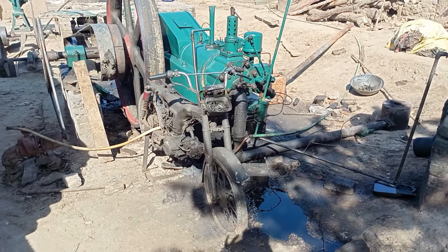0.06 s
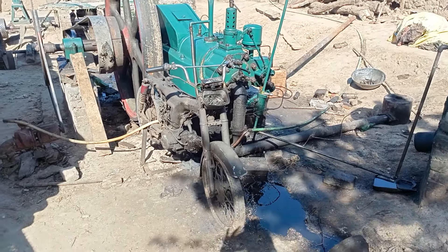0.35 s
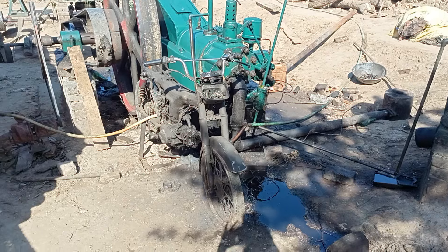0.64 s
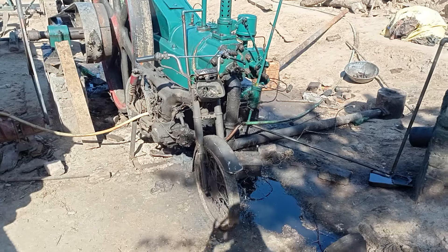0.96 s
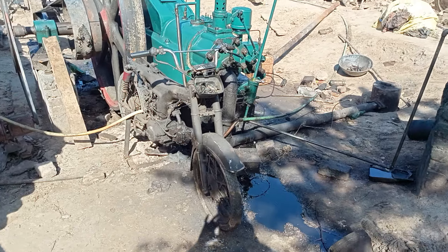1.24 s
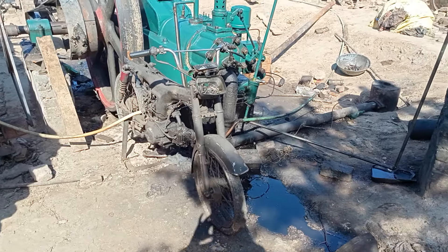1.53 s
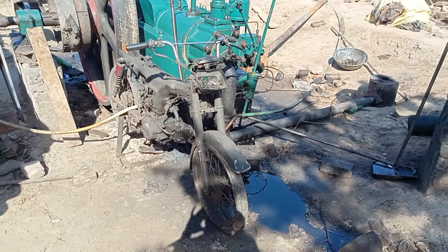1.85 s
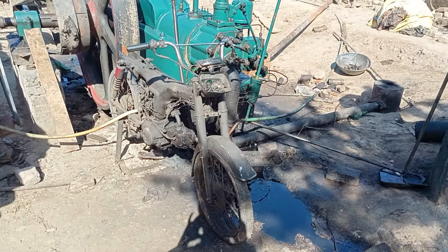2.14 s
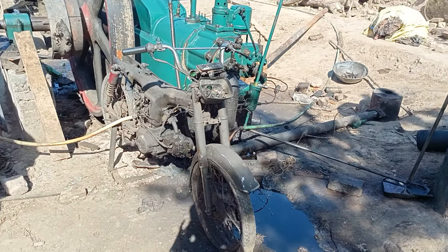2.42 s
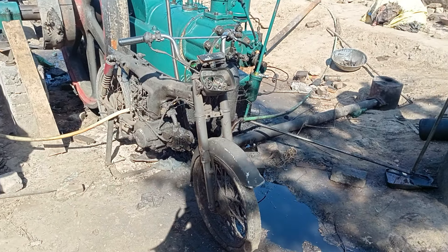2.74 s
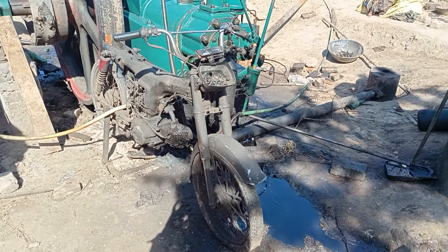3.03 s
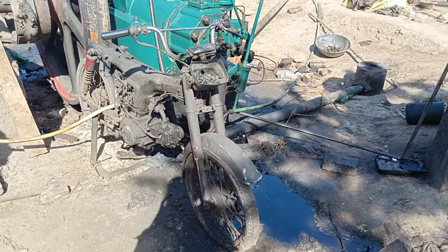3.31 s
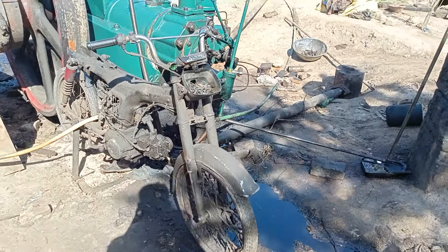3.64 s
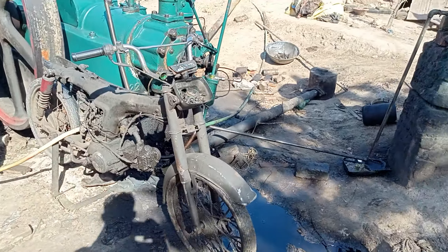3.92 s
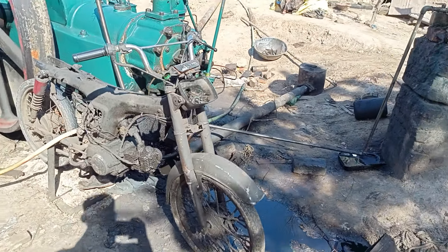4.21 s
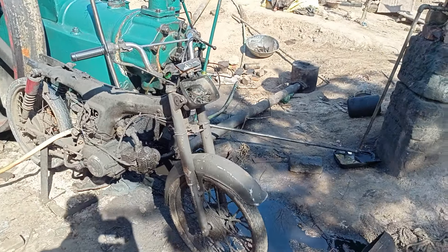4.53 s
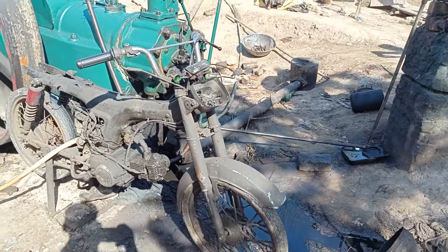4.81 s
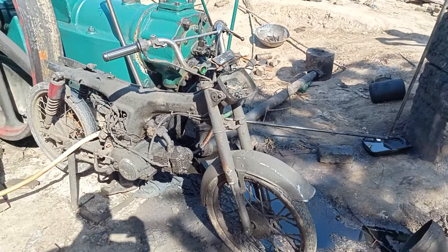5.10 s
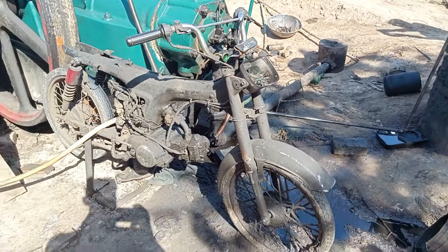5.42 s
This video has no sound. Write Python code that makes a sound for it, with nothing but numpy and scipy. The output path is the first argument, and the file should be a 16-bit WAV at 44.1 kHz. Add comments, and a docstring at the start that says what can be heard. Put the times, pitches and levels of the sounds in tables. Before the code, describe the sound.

Scattered birdsong outdoors, joined by a brief low hum, soft wind thumps on the microphone and then shoes scuffing over sandy ground.

```python
"""Birds in a quiet farmyard

Small birds chirp, whistle and twitter in gliding tones, scattered by walls and clutter.
A low hum swells and fades out, wind bumps the microphone, and something hard rings from one knock.
Shoes scuff over gritty ground in a spray of tiny clicks, all over a soft outdoor rustle."""
import sys
import numpy as np
from scipy import signal
from scipy.fft import rfft, irfft, next_fast_len
from scipy.io import wavfile
from scipy.ndimage import uniform_filter1d

SR = 44100
rng = np.random.default_rng(int(sys.argv[2]) if len(sys.argv) > 2 else 0)


def put_to_file(sound):
    """Save the sound as 16-bit audio at rate SR, in the file named by the first command-line argument."""
    columns = np.atleast_2d(sound).T  # one column per channel
    safe = np.clip(columns, -1, 1)
    whole_steps = np.round(safe * 32767)
    wavfile.write(sys.argv[1], SR, whole_steps.astype(np.int16))


N = 249606
TIME = np.arange(N) / SR


def undb(db):
    """Turn decibels into a number to multiply by."""
    return 10 ** (np.asarray(db) / 20)


def unit(x):
    """Scale a sound to an average strength (rms) of 1."""
    return x / np.sqrt(np.mean(np.abs(x) ** 2) + 1e-30)


def swell(centre, length):
    """A bell-shaped rise and fall, about length seconds wide."""
    return np.exp(-np.minimum(np.pi * ((TIME - centre) / length) ** 2 * .75, 60))


def envelope(start, length, attack_s, release_s):
    """Rise in a straight line, hold, and die away once length seconds have passed."""
    rise = np.clip((TIME - start) / attack_s, 0, 1)
    return rise * np.exp(-np.clip((TIME - start - length) / release_s, 0, 60))


def colour(x, points):
    """Shape the lows and highs of a sound along (f/Hz, level/dB) points; rms 1."""
    hz, db = np.transpose(points)
    size = next_fast_len(N)
    f = np.maximum(np.fft.rfftfreq(size, 1 / SR), 1)
    gain = undb(np.interp(np.log(f), np.log(hz), db))
    return unit(irfft(rfft(x, size) * gain, size)[:N])


def band(x, low_hz, high_hz, order=2):
    """Keep what lies between two frequencies; rms 1."""
    sos = signal.butter(order, [low_hz, min(high_hz, SR * .45)], "band", fs=SR, output="sos")
    return unit(signal.sosfilt(sos, x))


def resonance(x, hz, width_hz):
    """Make a sound ring around one frequency; rms 1."""
    return unit(signal.lfilter(*signal.iirpeak(hz, hz / width_hz, fs=SR), x))


def wander(rate_hz):
    """A smooth random wobble (complex numbers) that changes about rate_hz times a second; rms 1."""
    lead = SR // 2
    noise = rng.standard_normal(N + lead) + 1j * rng.standard_normal(N + lead)
    return unit(signal.sosfilt(signal.butter(2, rate_hz, fs=SR, output="sos"), noise)[lead:])


def ring(hz, width_hz):
    """Noise so narrow that it sounds like a wavering tone; rms 1."""
    return unit(np.real(wander(width_hz / 2) * np.exp(2j * np.pi * hz * TIME)))


def yard(x, near_db, far_db):
    """Add a quick scatter off nearby clutter and a thin echo from the walls."""
    t = TIME[:SR // 2]
    fade_s = np.array([[0.056], [0.42]])  # time to fall 60 dB: clutter, walls
    near, far = rng.standard_normal((2, len(t))) * undb(-60 * t / fade_s) * (t > .003)
    echo = undb(near_db) * near / np.linalg.norm(near) + undb(far_db) * far / np.linalg.norm(far)
    return x + signal.fftconvolve(x, echo)[:N]


def bird(notes, rasp_hz, softness=0.48):
    """Each note is a whistle gliding through three pitches; the rougher it is, the more it flutters."""
    out, flutter = np.zeros(N), wander(rasp_hz)
    for start, length, first, middle, last, db, rough in notes:
        span = slice(max(int(start * SR), 0), min(int((start + length) * SR), N))
        progress = np.clip((TIME[span] - start) / length, 0, 1)
        hz = np.polyval(np.polyfit([0, .5, 1], [first, middle, last], 2), progress)
        rough = np.clip(rough, 0, 1)
        voice = np.sqrt(1 - rough ** 2) + rough * flutter[span]
        effort = np.abs(np.sin(np.pi * progress)) ** softness
        out[span] += undb(db) * effort * np.real(voice * np.exp(2j * np.pi * np.cumsum(hz) / SR))
    return out


def glides(calls, sag=0):
    """Give each call a middle pitch: halfway between its ends, lowered by the share sag."""
    return [(s, length, first, (1 - sag) * (first + last) / 2, last, db, rough)
            for s, length, first, last, db, rough in calls]


# tone colour of the still air: f/Hz, level/dB
AIR_COLOUR = [(18, -55), (30, -6), (113, -0.5), (280, 0.5), (378, 3), (445, -2.5), (589, -6.5), (797, -10),
              (1010, -11), (1240, -40.5), (1420, -14), (2670, -19.5), (2860, -38.5), (4450, -44.5),
              (7780, -40), (10100, -72.5), (17100, -120)]


def air():
    """Still outdoor air: a faint, steady, mostly low noise."""
    return undb(-71) * colour(rng.standard_normal(N), AIR_COLOUR)


def flock(low_hz, high_hz, fall, spread_db, count, length_s=0.11):
    """Birds too far off to tell apart: a blur of short, rough, falling notes; rms 1."""
    notes = []
    for when, pitch, size, slope, loud in rng.random((count, 5)):
        hz = low_hz + pitch * (high_hz - low_hz)
        pitches = hz * (1 + fall * slope), hz, hz * (1 - fall * slope)
        notes.append((when * (TIME[-1] - .05), length_s * (.5 + size), *pitches, spread_db * loud, .9))
    return unit(yard(bird(notes, rasp_hz=115), near_db=1.5, far_db=-11))


# rise and fall of the rustle: t/s, body level/dB, hiss level/dB
RUSTLE_LEVELS = [(0.0, -76, -80.5), (0.35, -58.5, -71.5), (0.52, -70.5, -74), (0.69, -68, -73),
                 (0.93, -74.5, -80), (1.07, -74, -82.5), (1.32, -75.5, -88), (1.46, -73.5, -81),
                 (2.18, -69.5, -70), (2.47, -65.5, -80.5), (2.71, -72.5, -79.5), (2.95, -70.5, -79),
                 (3.2, -59, -63.5), (3.34, -70, -71.5), (3.72, -62.5, -81.5), (3.89, -70.5, -82),
                 (4.11, -71, -81.5), (4.24, -66, -70.5), (4.36, -64.5, -77), (4.51, -68.5, -84.5),
                 (4.62, -78, -86.5), (4.93, -76.5, -88), (5.22, -74.5, -80.5), (5.47, -68.5, -80.5),
                 (5.66, -77, -82.5)]
# tone colour of the rustle: f/Hz, level/dB
RUSTLE_COLOUR = [(530, -42), (900, -4.5), (1000, -7.5), (1310, 9.5), (1550, 4), (1800, 0.5), (2450, -2),
                 (2830, -8.5), (3990, -7), (4870, -12), (6210, -21), (7440, -24.5), (7780, -29),
                 (10100, -19.5), (17100, -120)]


def rustle(flicker_db=5.0, flock_db=-6):
    """A soft flickering rustle and distant bird chatter that rise and fall together."""
    times, body_db, hiss_db = np.transpose(RUSTLE_LEVELS)
    noise = colour(rng.standard_normal(N), RUSTLE_COLOUR)
    body = undb(-2.86 + flicker_db * wander(23).real) * band(noise, 1050, 3600, order=3)
    hiss = undb(-0.8 + flicker_db * wander(12).real) * band(noise, 3220, 7000, order=3)
    body += undb(flock_db) * flock(1900, 3500, fall=.12, spread_db=11, count=150)
    hiss += undb(flock_db) * flock(3500, 5900, fall=0.049, spread_db=4.5, count=260)
    return undb(np.interp(TIME, times, body_db)) * body + undb(np.interp(TIME, times, hiss_db)) * hiss


# swells of the hum: t/s, length/s, level/dB
HUM_SWELLS = [(-0.02, 0.068, -45), (0.074, 0.045, -43), (0.142, 0.066, -43), (0.257, 0.059, -41),
              (0.337, 0.066, -42), (0.459, 0.046, -43.5), (0.529, 0.058, -44), (0.592, 0.15, -53.5)]


def hum(hz=339):
    """A low tone comes in swells with a wavering lower partner; a faint drone stays on."""
    level = sum(undb(db) * envelope(s, length, attack_s=0.014, release_s=0.0085)
                for s, length, db in HUM_SWELLS)
    tone = np.sin(2 * np.pi * hz * TIME + 0.64 * wander(25).real)
    partner = undb(-8) * ring(295, 38) * uniform_filter1d(level, SR // 8)
    drone = undb(-79.5) * ring(345, 16) + undb(-75.5) * ring(392, 20)
    return level * tone + partner + drone


# gusts of light wind: t/s, length/s, level/dB
GUSTS = [(0.756, 0.073, -52.5), (1.021, 0.068, -44), (1.145, 0.2, -45.5), (1.453, 0.16, -47.5),
         (1.632, 0.1, -54), (1.976, 0.081, -58), (5.145, 0.25, -57), (5.51, 0.21, -62.5)]


def wind_gusts():
    """Each gust is a swell of deep rumbling noise."""
    level = sum(undb(db) * envelope(s, length, attack_s=0.026, release_s=0.023)
                for s, length, db in GUSTS)
    return level * band(rng.standard_normal(N), 40, 100.7, order=3)


# bumps of wind: t/s, f/Hz, level/dB, fade time/cycles
BUMPS = [(0.745, 69.6, -44, 0.39), (0.845, 78, -43.5, 0.6), (0.992, 110.8, -17.5, 1.9),
         (1.035, 199, -33, 2.1), (1.222, 95, -27.5, 0.56), (1.299, 97, -23.5, 0.88),
         (1.413, 87.6, -34.5, 1), (1.547, 72, -39, 1.2), (1.59, 112, -37.5, 0.74), (1.619, 75, -39.5, 1.2),
         (1.971, 100, -43, 0.79), (1.995, 88.4, -35, 0.77)]


def wind_bumps(rise_cycles=1.11, overtone_cycles=1.2):
    """Swirls of air push the microphone for a cycle or two, with a brief higher tone at each peak."""
    out = np.zeros(N)
    for s, hz, db, cycles in BUMPS:
        fade = np.exp(-np.minimum(np.abs(TIME - s) * hz / cycles, 20))
        push = np.where(TIME < s, swell(s, rise_cycles / hz), fade)
        phase = 2 * np.pi * hz * (TIME - s)
        overtone = undb(-11) * swell(s, overtone_cycles / hz) * np.sin(1.55 * phase)
        out += undb(db) * (push * np.cos(phase) + overtone)
    return signal.sosfilt(signal.butter(2, 40, "high", fs=SR, output="sos"), out)


# the blow and its small rebound: t/s, level/dB
KNOCKS = [(1.1114, -37.5), (1.1175, -59)]
# ringing tones of the knocked object: f/Hz, level/dB, time to fall 60 dB/s
KNOCK_TONES = [(680, 1.5, 0.044), (1440, -20.5, .025), (1600, -16, 0.0035), (2100, -6.5, 0.062),
               (2300, 8.5, 0.0093), (2660, -27, 0.029)]


def knock(crack_fade_s=0.01, echo_fade_s=0.12):
    """A hard tap: short ringing tones, a crack at contact and a brief rattle of echoes."""
    out = np.zeros(N)
    noise = band(rng.standard_normal(N), 1400, 2100, order=1)
    t = TIME[:SR // 5]
    tones = sum(undb(db - 60 * t / fade_s) * np.sin(2 * np.pi * hz * t) for hz, db, fade_s in KNOCK_TONES)
    burst = undb(-5 - 60 * t / crack_fade_s) + undb(-16 - 60 * t / echo_fade_s)
    for s, db in KNOCKS:
        span = slice(int(s * SR), int(s * SR) + len(t))
        out[span] += undb(db) * (tones + burst * noise[span])
    # the contact lasts a moment, which dulls the treble; a small object gives off no bass
    return signal.sosfilt(signal.butter(4, [450, 4600], "band", fs=SR, output="sos"), out)


# tone colour of the grit: f/Hz, level/dB
GRIT_COLOUR = [(180, -47.5), (300, -29), (344, 18.5), (439, -20), (497, 7.5), (546, -1.5), (618, 3.5),
               (698, 2), (892, -6), (995, -9.5), (2510, -10), (2690, -12), (4100, -14.5), (4700, -8),
               (7780, -38.5), (10100, -72), (17100, -120)]
# where sole and ground ring: f/Hz, width/Hz, level/dB
SOLE_RINGS = [(1110, 43, -22.5), (2304, 69, -23), (2594, 180, -23), (4160, 41, -34.5)]


def gritty_ground(click_chance=.12):
    """Dense, uneven clicks under a sole; returns the bare grains and a ringing, sandy mix."""
    sizes = undb(np.minimum(rng.exponential(size=N), 4))
    clicks = rng.standard_normal(N) * sizes * (rng.random(N) < click_chance)
    grains = colour(clicks, GRIT_COLOUR)
    crisp = undb(-43) * band(clicks, 7100, SR * .45)  # the finest sand
    sole = sum(undb(db) * resonance(band(clicks, 570, 4500), hz, width) for hz, width, db in SOLE_RINGS)
    return grains, undb(-2) * band(grains, 660, 4660) + sole + crisp


# hollow rings under the shoe: t/s, length/s, f/Hz, level/dB
HOLLOWS = [(2.777, .1, 680, -48), (2.864, 0.061, 592, -56.5), (3.076, 0.3, 528, -54.5),
           (3.216, 0.088, 738, -55), (3.383, 0.042, 384, -59), (3.506, 0.086, 410.2, -56.5),
           (3.613, 0.13, 681.4, -54), (3.741, 0.093, 689, -65), (3.844, .16, 516, -56.5)]


def hollow_rings():
    """The dragging shoe rings hollowly at two pitches, the lower one softer."""
    return sum(undb(db - 2) * envelope(s, length, attack_s=0.028, release_s=0.017)
               * (ring(hz, 55) + undb(-9) * ring(hz * .64, 80)) for s, length, hz, db in HOLLOWS)


# heel and toe catching: t/s, length/s, thud f/Hz, level/dB
CATCHES = [(2.778, 0.0056, 696, -57), (2.82, 0.014, 690, -54.5), (2.821, 0.013, 1100, -49),
           (2.86, 0.0076, 580, -45), (3.072, 0.006, 540, -56), (3.119, 0.019, 538, -52),
           (3.235, 0.0082, 607, -43.5), (3.653, 0.0081, 725, -39.5), (3.666, 0.015, 780, -49)]


def shoe_catches(scrape):
    """Heel or toe catches on the ground: a short thud with a burst of scraping."""
    out = np.zeros(N)
    for s, length, hz, db in CATCHES:
        thud = np.cos(2 * np.pi * hz * (TIME - s))
        out += undb(db) * swell(s, length) * (undb(-8) * scrape + undb(-1) * thud)
    return out


# steps: touch t/s, full weight t/s, lift t/s, level/dB, relative level of fine grit/dB
STEPS = [(2.755, 2.838, 2.88, -47.5, -16), (3.059, 3.259, 3.31, -48, -14), (3.545, 3.646, 3.755, -47, -17),
         (3.805, 3.93, 3.92, -63.5, -18)]


def scuffs(rise_db=16, fall_db=5, crush_db=2.5, crush_s=0.034):
    """Soles drag over sand, loudest as the full weight comes down and crushes it."""
    grains, sand = gritty_ground()
    fine_grit = band(grains, 5230, 7700)
    steps = np.zeros(N)
    for touch, weight, lift, db, grit_db in STEPS:
        pressure_db = db - np.interp(TIME, [touch, weight, lift], [rise_db, 0, fall_db])
        pressure_db += crush_db * swell(weight, crush_s)
        contact = envelope(touch, lift - touch, attack_s=.007, release_s=0.033)
        steps += undb(pressure_db) * contact * (sand + undb(grit_db) * fine_grit)
    hollow = hollow_rings()
    crunch = undb(2 * wander(78).real)  # the grit gives way unevenly
    return crunch * steps + hollow + shoe_catches(grains + sand)


# hoarse calls: t/s, length/s, first f/Hz, last f/Hz, level/dB, roughness (0 pure, 1 all rasp)
HOARSE_CALLS = [(0.89, 0.17, 1478, 1330, -62, 0.83), (0.92, .12, 1830, 1790, -62.5, 0.89),
                (2.11, 0.07, 1327, 1416, -65.5, 0.5), (2.245, 0.098, 1837, 1833, -58, 0.65),
                (2.54, .1, 2530, 1940, -71, 0.33), (2.63, 0.096, 1570, 1470, -62.5, 0.63),
                (2.75, .1, 1950, 2390, -54.5, 1), (3.01, 0.069, 1430, 1455, -66.5, 0.64),
                (3.47, 0.16, 1682, 1790, -61, 1), (4.37, 0.076, 1678, 1567, -62, 0.45),
                (4.45, 0.061, 1570, 1719, -54, 0.46), (4.59, 0.069, 1650, 1700, -65.5, 0.5),
                (5.52, 0.23, 1280, 1423, -65, 0.95)]


def hoarse_calls():
    """Distant birds rasp, with plenty of echo from the walls."""
    return yard(bird(glides(HOARSE_CALLS), rasp_hz=175), near_db=-4.5, far_db=-4.5)


# clearer, lower calls: t/s, length/s, first f/Hz, last f/Hz, level/dB, roughness
LOW_CALLS = [(-0.01, 0.018, 1060, 1070, -50, 0.37), (0.028, 0.033, 1058, 967, -53, 0.4),
             (0.19, 0.056, 796, 805, -56, 0.62), (0.27, 0.045, 789, 843, -49, 0.7),
             (0.28, .04, 734, 640, -51.5, 0.1), (1.675, 0.044, 379, 407, -60.5, 0.2),
             (2.44, 0.072, 712, 650, -58.5, 0.2), (4.31, 0.052, 872, 865, -65.5, 0.2)]


def low_calls():
    """Short low notes carry from deeper in the yard."""
    return yard(bird(glides(LOW_CALLS), rasp_hz=68), near_db=-3.5, far_db=-11.5)


def phrase(arch, count, sounding_share=.7, roughness=0.1):
    """A run of quick scooped notes along an arch of pitch, each a little off in time, pitch and level."""
    s, hz, db = np.transpose(arch)
    beat = (s[-1] - s[0]) / count
    scoop = 0.017 * np.array([.5, -.5, .5])  # start, middle and end of a note
    notes = []
    for k, (late, off, slide, loud) in enumerate(np.clip(rng.standard_normal((count, 4)), -1.5, 1.5)):
        times = s[0] + beat * (k + 0.19 * late + sounding_share * np.array([0, .5, 1]))
        bend = 1 + .028 * off + .025 * slide * np.array([-1, 0, 1]) + scoop
        pitches = np.interp(times, s, hz) * bend
        level_db = np.interp(times[1], s, db) + 3 * loud
        notes.append((times[0], beat * sounding_share, *pitches, level_db, roughness))
    return notes


# two twittering phrases, each a list of points on an arch: t/s, f/Hz, level/dB
ARCHES = [
    [(1.58, 6800, -72), (1.66, 6850, -79), (1.74, 7430, -72), (1.86, 6800, -83), (1.93, 6350, -68.5),
     (2.0, 6600, -80), (2.07, 7220, -73), (2.13, 6070, -94), (2.22, 5730, -71)],
    [(4.115, 6600, -75), (4.16, 6350, -64.5), (4.2, 6880, -72.5), (4.3, 7420, -66.5), (4.38, 7350, -73.5),
     (4.45, 7220, -70), (4.5, 6550, -85)],
]


def twitter(buzz_ratio=2 / 3, buzz_above_hz=6450):
    """Two fast runs of notes; a rough second voice buzzes below the highest ones."""
    song = phrase(ARCHES[0], count=22) + phrase(ARCHES[1], count=18)
    under = [(s, length, first * buzz_ratio, middle * buzz_ratio, last * buzz_ratio, db - 1, 1)
             for s, length, first, middle, last, db, _ in song if middle > buzz_above_hz]
    clear = yard(bird(song, rasp_hz=260), near_db=-4.5, far_db=-21)
    buzz = yard(bird(under, rasp_hz=146), near_db=-3.5, far_db=-3)
    return clear + buzz


# thin whistles: t/s, length/s, first f/Hz, last f/Hz, level/dB
WHISTLES = [(0.019, 0.052, 5390, 5294, -63.5), (0.192, 0.15, 7500, 8750, -90.5),
            (0.358, 0.052, 8350, 8700, -91), (1.26, 0.077, 4520, 4380, -62),
            (1.312, 0.019, 4370, 4140, -55), (1.333, 0.02, 4440, 4170, -62.5),
            (1.433, 0.048, 4230, 4880, -71.5), (1.485, 0.039, 5630, 5840, -57.5),
            (1.516, 0.06, 5800, 6770, -62), (1.61, 0.045, 6300, 6780, -65), (1.91, 0.012, 5770, 5900, -68),
            (2.12, 0.017, 6050, 6060, -63.5), (2.371, 0.024, 6170, 5750, -70.5),
            (4.1, 0.032, 5230, 5580, -64.5), (4.205, .016, 5500, 5450, -66.5),
            (4.686, 0.043, 4650, 4080, -66.5), (4.734, 0.022, 4357, 4290, -61),
            (4.818, 0.038, 4180, 3980, -58.5)]


def whistles(roughness=0.12):
    """Birds close by slide through high, almost pure notes."""
    notes = glides([(*row, roughness) for row in WHISTLES])
    return yard(bird(notes, rasp_hz=255, softness=0.78), near_db=-7.5, far_db=-16.5)


# chirps: t/s, length/s, first f/Hz, last f/Hz, level/dB, roughness, relative level of lower voice/dB
CHIRPS = [(0.083, 0.098, 3663, 3170, -65.5, 0.55, 5), (0.148, 0.063, 3635, 3043, -51.5, 0.47, -4.5),
          (0.517, 0.072, 3610, 3096, -60, 0.94, -8), (0.929, 0.061, 3766, 3304, -59.5, 0.44, -15),
          (1.344, 0.033, 3590, 3350, -55, 0.5, -1), (1.51, 0.095, 3440, 3200, -62, 0.64, 1),
          (1.63, 0.068, 4580, 4200, -67, 0.9, -8), (1.679, .06, 4040, 3170, -57, .66, -12),
          (1.8, 0.027, 3490, 2950, -56, 0.32, -18), (1.921, 0.022, 2780, 2500, -63.5, 0, -19),
          (2.015, 0.021, 3900, 3750, -56, 0.24, -11), (2.037, 0.039, 3500, 3040, -50, 0.63, -8.5),
          (2.149, 0.11, 3164, 2700, -66, 0.33, -4), (2.473, 0.036, 3470, 2800, -68.5, 1.1, -16),
          (4.018, 0.032, 3330, 3110, -57, 0.22, -24), (4.072, 0.035, 3810, 3520, -56, 0.5, -15),
          (4.102, 0.031, 3410, 3046, -54, 0.6, -14), (4.473, .04, 3900, 3210, -66, .7, -16),
          (4.836, 0.038, 4065, 3307, -57, 0.7, -13.5), (5.267, 0.059, 4050, 3186, -63, 1.1, -9),
          (2.949, .14, 6140, 5810, -72.5, 1, -2), (5.328, 0.088, 5610, 5520, -77.5, 1.1, 4.5)]


def chirps(lower_ratio=.81, lag_share=0.41, length_share=0.87, flutter_db=3.0):
    """Falling chirps close by, each with a lower second voice that starts a little late."""
    upper = [row[:6] for row in CHIRPS]
    lower = [(s + lag_share * length, length_share * length,
              first * lower_ratio, last * lower_ratio, db + lower_db, rough)
             for s, length, first, last, db, rough, lower_db in CHIRPS]
    flutter = undb(flutter_db * wander(65).real)  # each chirp flutters unevenly in loudness
    voices = bird(glides(upper + lower, sag=.015), rasp_hz=248, softness=0.31)
    return yard(flutter * voices, near_db=-6.5, far_db=-8.5)


def scene():
    """Everything in the yard, heard at one microphone."""
    birds = chirps() + whistles() + twitter() + low_calls() + hoarse_calls()
    return (birds + hum() + wind_bumps() + wind_gusts() + knock() + scuffs() + rustle() + air())[None]


def record(dry):
    """Cut away the highest treble, above 15500 Hz."""
    return signal.sosfilt(signal.ellip(8, .2, 70, 15500, fs=SR, output="sos"), dry)


dry = scene()
out = record(dry)
put_to_file(out)
```